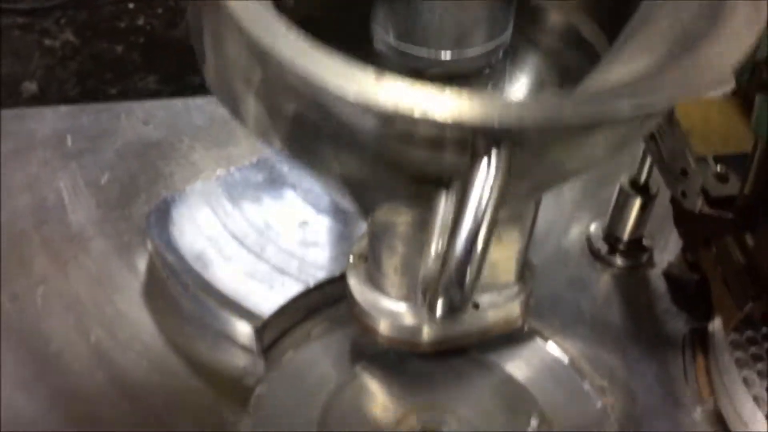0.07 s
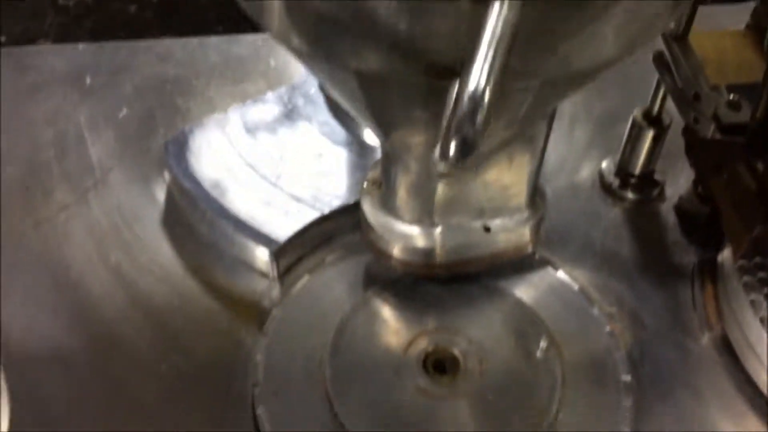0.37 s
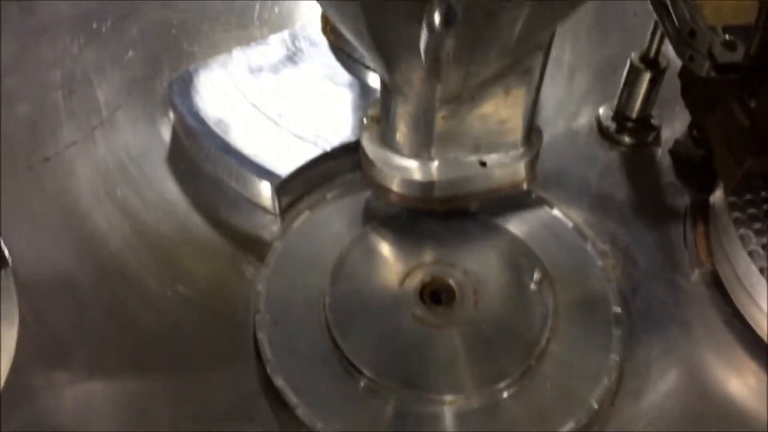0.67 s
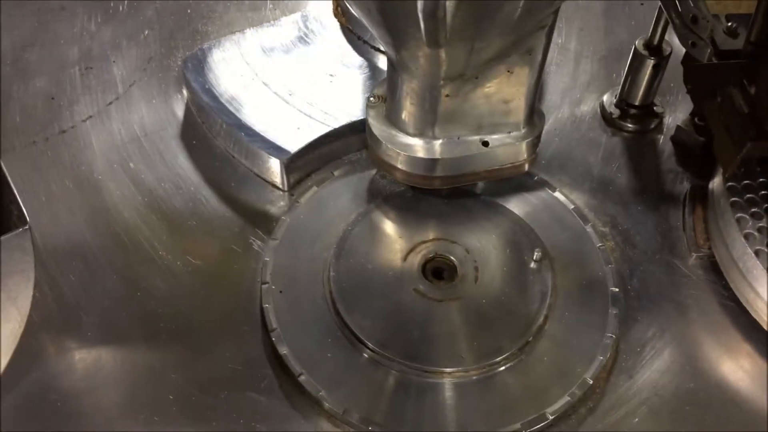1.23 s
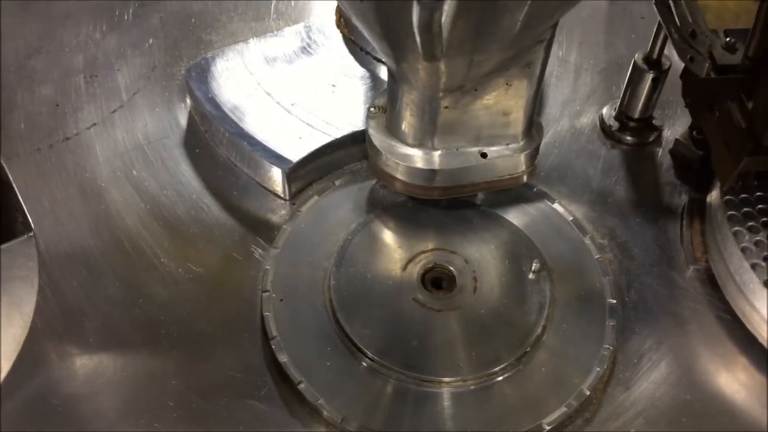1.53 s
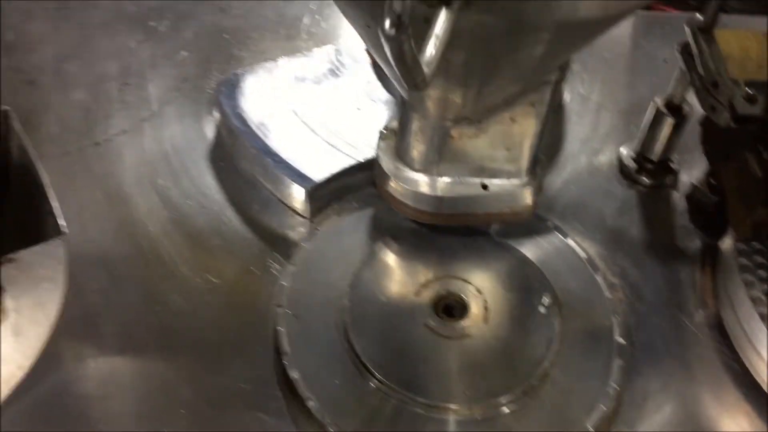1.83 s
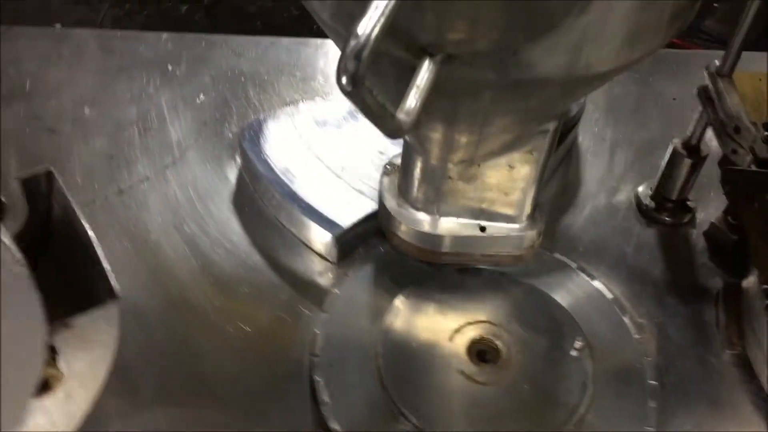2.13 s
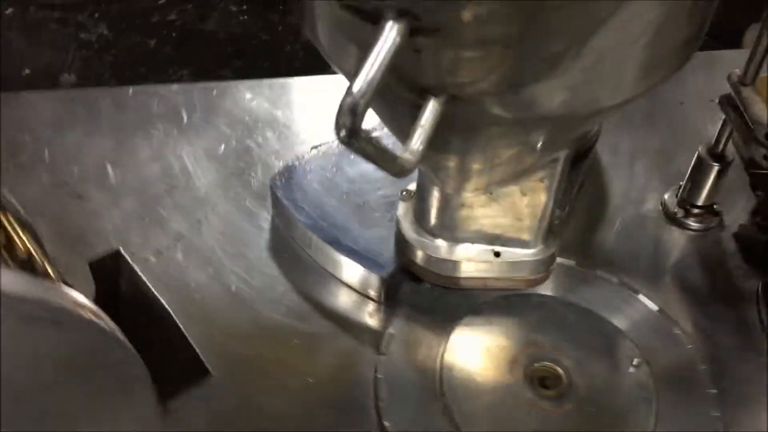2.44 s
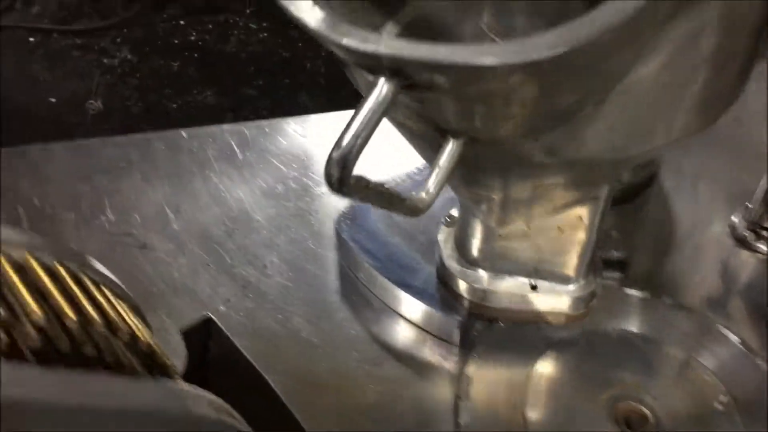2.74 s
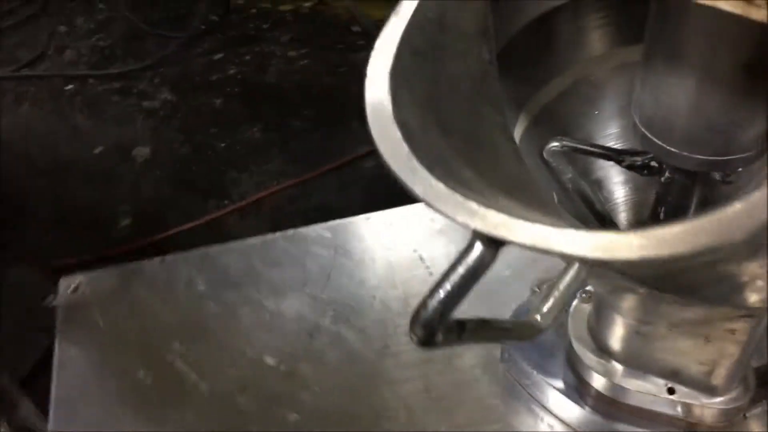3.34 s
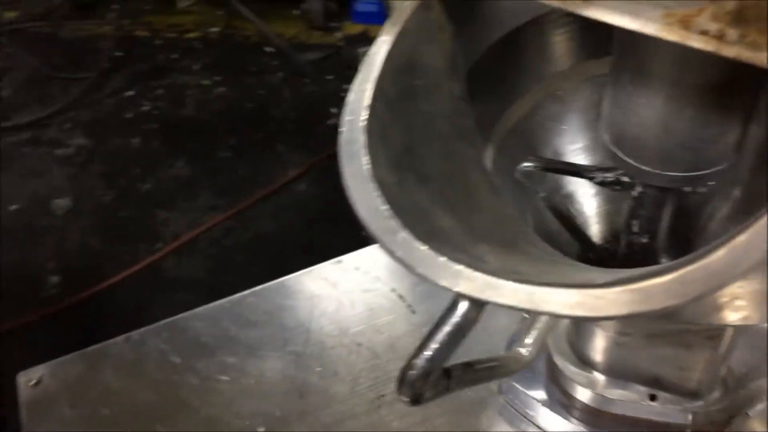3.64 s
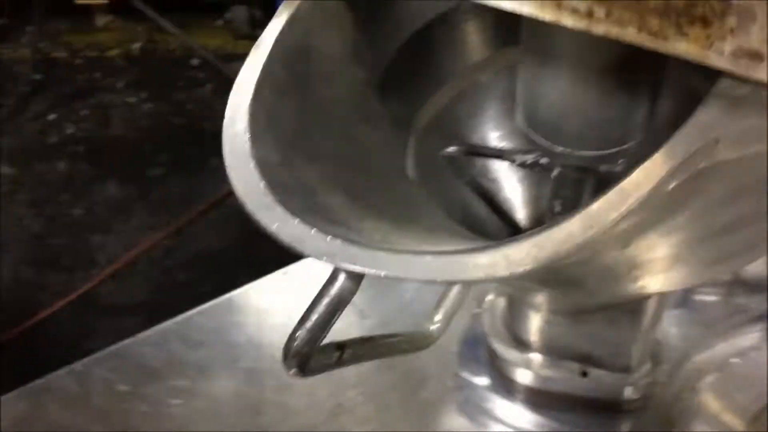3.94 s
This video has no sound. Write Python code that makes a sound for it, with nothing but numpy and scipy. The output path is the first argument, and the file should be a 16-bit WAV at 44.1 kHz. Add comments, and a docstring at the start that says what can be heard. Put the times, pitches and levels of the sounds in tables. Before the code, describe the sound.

Close up in a workshop, a motorised steel machine runs at full speed with a rattling, hissing drone. It then falls in pitch and stops with a sharp metallic click. Soft hum and a few small ticks remain.

```python
"""A capsule filling machine runs at full speed: its motor turns a seven-beat drive that drones,
rattles and hisses in a steel housing. At about 2 s the power is cut and the drive coasts down
through the housing's resonances, shaking the panels. A metal catch clicks as it comes to rest.
Mains hum, workshop air and a few faint ticks remain; a faint whir fades in near the end."""
import sys
import numpy as np
from scipy import signal
from scipy.fft import rfft, irfft
from scipy.io import wavfile
from scipy.ndimage import uniform_filter1d

SR = 44100
rng = np.random.default_rng(int(sys.argv[2]) if len(sys.argv) > 2 else 0)


def waveform_to_disk(signal):
    """Save audio, clipped to [-1, 1], as 16-bit WAV at the path in sys.argv[1]."""
    frames = np.transpose(np.atleast_2d(signal))
    scaled = np.clip(frames, -1, 1) * 32767
    samples = np.round(scaled).astype(np.int16)
    wavfile.write(sys.argv[1], SR, samples)


N = 176400
T = np.arange(N) / SR
HZ = np.fft.rfftfreq(N, 1 / SR)

SHAFT_HZ, BEATS_PER_TURN, TURNS_PER_BELT = 29.67, 7, 3
CUT_S, COAST_S, SLACK_RISE_S = 2.04, .6, .067
SLACK = np.clip((T - CUT_S) / SLACK_RISE_S, 0, 1)  # 0 under power, 1 coasting


def amp(db):
    """Decibels to gain."""
    return 10 ** (np.asarray(db) / 20)


def unit(x):
    """Scales to rms 1."""
    return x / np.sqrt(np.mean(x ** 2) + 1e-20)


def response(broad=((1, -80),), peaks=()):
    """Gain over HZ of a broad spectrum with resonances standing on it."""
    hz, db = np.transpose(broad)
    power = amp(np.interp(np.log(HZ + 1), np.log(hz + 1), db)) ** 2
    for centre, width, peak_db in peaks:
        power += (amp(peak_db) / (1 + 2 * ((HZ - centre) / width) ** 2)) ** 2
    return np.sqrt(power)


def colour(x, gain):
    """Minimum-phase filter with the given gain over HZ."""
    cepstrum = irfft(np.log(np.maximum(gain, 1e-6)), N)
    cepstrum[1:N // 2] *= 2
    cepstrum[N // 2 + 1:] = 0
    impulse = irfft(np.exp(rfft(cepstrum)), N)[:8192]
    return signal.fftconvolve(x, impulse)[:len(x)]


def noise_band(hz, width_hz, samples=N):
    """Band of noise, rms 1."""
    return unit(colour(rng.standard_normal(samples), 1 / (1 + (2 * (HZ - hz) / width_hz) ** 2)))


def drift(rate_hz):
    """Random motion below about rate_hz, rms 1."""
    return unit(irfft(rfft(rng.standard_normal(N)) / (1 + (HZ / rate_hz) ** 4), N))


def decay(t, t60_s):
    """Falls 60 dB in t60_s."""
    return np.exp(-np.log(1000) * t / t60_s)


def add(mix, start_s, sound):
    """Mixes a sound in at start_s."""
    part = mix[round(start_s * SR):][:len(sound)]
    part += sound[:len(part)]


def echoes(x, db, t60_s, delay_s):
    """Adds a diffuse tail of reflections."""
    t = np.arange(SR // 2) / SR
    tail = rng.standard_normal(len(t)) * decay(t, t60_s) * (t > delay_s)
    return x + amp(db) * signal.fftconvolve(x, tail / np.linalg.norm(tail))[:N]


# Workshop air. Each row: frequency in Hz, relative level in dB.
AIR_SPECTRUM = [(20, -27), (45, -2.5), (70, -4), (110, -4), (170, -11.5), (250, -5), (320, -14),
                (520, -14.5), (780, -19.5), (1000, -18.5), (1500, -28.5), (2200, -32.5), (3200, -39),
                (5000, -43), (8000, -46), (12400, -48.5), (16000, -51)]


def air():
    """Soft wash of air, slightly patchy in time and frequency."""
    spectra = signal.stft(rng.standard_normal(N), nperseg=1024)[2]
    patches = uniform_filter1d(rng.standard_normal(spectra.shape), size=8, axis=0)
    patch_db = 1.2 * unit(uniform_filter1d(patches, size=7, axis=1))
    wash = signal.istft(spectra * amp(patch_db), nperseg=1024)[1][:N]
    return amp(-49.5) * unit(colour(wash, response(AIR_SPECTRUM)))


# Mains hum envelope. Each row: time in seconds, rms level in dB.
MAINS_ENVELOPE = [(0, -45.5), (2.3, -42.5), (2.79, -42), (2.83, -53.5), (3.05, -50), (3.33, -52.5),
                  (3.36, -45), (4, -45)]
# Other equipment. Each row: frequency in Hz, rms level in dB.
EQUIPMENT_TONES = [(239.5, -52), (359.5, -65), (479, -65), (538, -62.5), (646, -68.5), (1443, -75),
                   (2590, -82), (4660, -87)]


def hum(mains_hz=120, waver=.23):
    """Mains hum that dips briefly after the stop, and wavering tones of other equipment."""
    out = amp(np.interp(T, *np.transpose(MAINS_ENVELOPE))) * np.sin(2 * np.pi * mains_hz * T)
    for hz, db in EQUIPMENT_TONES:
        out += amp(db) * (1 + waver * drift(7.5)) * np.sin(2 * np.pi * hz * T + waver * drift(3))
    return np.sqrt(2) * out


def whir(start_s=3.28, rise_s=.34):
    """A distant whir with a fuzzy tone in it fades in."""
    rush = amp(-67.5) * noise_band(hz=1700, width_hz=870)
    tone = amp(-66) * noise_band(hz=1448, width_hz=37)
    return (rush + tone) * np.clip((T - start_s) / rise_s, 0, 1)


# Knocks and ticks. Each row: start in seconds, level in dB, centre in Hz, width in Hz, T60 in seconds.
KNOCK_BURSTS = [(2.048, -41, 9000, 12000, 0.044), (2.524, -38, 820, 160, 0.11),
                (2.564, -34, 945, 264, 0.16), (2.622, -40, 956, 306, 0.14), (2.71, -66, 5000, 9000, 0.33),
                (2.786, -33, 81.5, 30, 0.13), (3.075, -43.5, 500, 400, 0.13),
                (3.345, -56.5, 3170, 1500, 0.083), (3.346, -52, 1470, 300, 0.06),
                (3.362, -60, 4000, 5000, 0.064), (3.594, -59, 4000, 4000, .018)]


def knocks():
    """Small dull knocks and ticks around the machine, from the power cut on."""
    out, t = np.zeros(N), np.arange(SR // 3) / SR
    for start_s, db, hz, width_hz, t60_s in KNOCK_BURSTS:
        add(out, start_s, amp(db) * noise_band(hz, width_hz, len(t)) * decay(t, t60_s))
    return out


# Strikes of the catch. Each row: start in seconds, level in dB.
CATCH_STRIKES = [(2.561, -25.5), (2.5635, -28.5), (2.574, -34.5), (2.6105, -40), (2.614, -44.5)]
# Crack of a strike. Each row: frequency in Hz, relative level in dB.
CRACK_SPECTRUM = [(100, -18), (900, -15), (2000, -13), (3000, -11), (7000, -16), (11000, -19), (16000, -11)]
# Resonances of the catch. Each row: centre in Hz, width in Hz, relative level in dB.
CATCH_RESONANCES = [(3870, 140, -3.5), (4750, 200, -8), (5500, 340, 0.5), (6690, 250, 9.5), (6900, 220, 5),
                    (9000, 300, 5.5), (9400, 320, 4), (11000, 320, 6), (11900, 400, -8), (13600, 600, -4)]


def catch():
    """A steel catch snaps home and rebounds; each crack rings briefly in its resonances."""
    out, t = np.zeros(N), np.arange(SR // 3) / SR
    envelope = decay(t, t60_s=.026) + amp(-16) * decay(t, t60_s=.09)
    for start_s, db in CATCH_STRIKES:
        add(out, start_s, amp(db) * envelope * rng.standard_normal(len(t)))
    return colour(out, unit(response(CRACK_SPECTRUM, CATCH_RESONANCES)))


# Shaken panels. Each row: centre in Hz, width in Hz, relative level in dB.
PANEL_RESONANCES = [(385.6, 24, 7.5), (733, 52, -4.5), (830, 58, 0), (929, 44, 2), (1040, 54, -14),
                    (1450, 150, -14), (4060, 350, -36)]


def panel_shake(speed):
    """With the power off, the slack drive shakes the panels unevenly until it stops."""
    shake = unit(colour(rng.standard_normal(N), response(peaks=PANEL_RESONANCES)))
    lumps_db = 2.5 * drift(20)
    return amp(-33 + lumps_db) * shake * SLACK * speed ** .78


# Sliding friction. Each row: frequency in Hz, relative level in dB.
SLIDE_SPECTRUM = [(100, -68), (1500, -10), (2420, -9), (2800, -2.5), (3700, -2.5), (4900, -12.5),
                  (6300, -8), (8000, -16.5), (10200, -22.5), (12500, -24.5), (15500, -34.5)]
# High resonances of the steel. Each row: centre in Hz, width in Hz, relative level in dB.
STEEL_RESONANCES = [(4084, 116, 10), (4325, 79, 7), (4720, 180, -1), (5370, 220, -2.5), (7160, 280, -4),
                    (8960, 570, -5.5), (11230, 650, -16.5)]


def hiss(speed, turns, settle_s=.47, scrape_s=2.055, scrape_width_s=.016):
    """Sliding parts hiss in pulses and ring the steel; they scrape as the load comes off."""
    surface = rng.standard_normal(1480)  # grain that comes round on every turn
    grain = np.interp(turns, np.linspace(0, 1, len(surface), endpoint=False), surface, period=1)
    pulse = 1 + .087 * np.cos(2 * np.pi * BEATS_PER_TURN * turns)
    flicker_db = 1.2 * drift(49)
    belt_slap_db = -.76 * np.cos(2 * np.pi * 2 * turns / TURNS_PER_BELT)
    scrape_db = 2 * np.exp(-((T - scrape_s) / scrape_width_s) ** 2)
    swing_db = flicker_db + belt_slap_db + scrape_db
    early_boost = amp(7 * np.exp(-(T / settle_s) ** 2))
    rub = (rng.standard_normal(N) + .39 * grain) * pulse * amp(swing_db) * early_boost
    slide = unit(colour(rub * speed ** 3.4, response(SLIDE_SPECTRUM)))
    chatter = rng.standard_normal(N) * amp(swing_db + 3 * drift(135)) * np.sqrt(early_boost)
    steel = unit(colour(chatter * speed ** 4.7, response(peaks=STEEL_RESONANCES)))
    return amp(-44) * slide + amp(-45.5) * steel


# Broad response of the housing. Each row: frequency in Hz, relative gain in dB.
HOUSING_SPECTRUM = [(20, -21), (60, -16), (150, -16.5), (300, -16.5), (1000, -35.5), (1750, -22.5),
                    (2380, -33), (3100, -32.5), (5000, -56), (16000, -56)]
# Its resonances. Each row: centre in Hz, width in Hz, relative gain in dB.
HOUSING_RESONANCES = [(201, 23.2, -3), (324.3, 23, -5), (376, 31, 2.5), (454, 55, -9.5), (592, 114, -12),
                      (744, 50, -8), (813, 103, -2.5), (913, 77, -6), (1021, 90, -6), (1220, 51, -12),
                      (1462, 107, -9.5), (1924, 37, -11), (2037, 64, -10), (2585, 172, -19.5)]


def housing():
    """Gain over HZ of the steel housing, which shapes rattle and drone."""
    return response(HOUSING_SPECTRUM, HOUSING_RESONANCES)


def rattle(speed, turns, body, spread_db=4.5):
    """Uneven knocks on each beat and loose chatter, loaded by belt and shaft, ring the housing."""
    beats = np.diff(np.floor(turns * BEATS_PER_TURN), prepend=0)
    hits = beats * rng.choice([-1, 1], N) * amp(spread_db * np.clip(rng.standard_normal(N), -2, 2))
    chatter = rng.standard_normal(N) * np.sqrt(speed)
    load = 1 + .079 * np.sin(2 * np.pi * turns / TURNS_PER_BELT) + .25 * np.sin(2 * np.pi * turns)
    force = (unit(hits) * speed ** .79 + unit(chatter)) * load * speed ** 1.35
    return amp(-34.5) * unit(colour(force, body))


# Drive tones. Each entry: frequency as a multiple of the shaft rate.
SHAFT_ORDERS = [6.667, 7, 7.195, 11, 12.84, 14, 15, 21, 24, 25, 27, 28, 30, 31.69, 35, 40.5, 49, 52.04, 56,
                63, 69.8, 77, 84, 88, 105, 135.75, 147.37]
# Their levels, in the same order. Each entry: amplitude at full speed in dB.
SHAFT_ORDER_DB = [-93, -26, -47, -47.5, -40.5, -35, -50, -41, -52, -50.5, -47, -29, -56, -42, -44, -52,
                  -43.5, -50.5, -52, -51.5, -46.5, -59, -54.5, -65, -48.5, -54, -47.5]


def drone(speed, turns, body, max_swell_db=19, radiate_hz=186, throb_hz=5.8):
    """Shaft orders throb and waver; coasting, they roughen and swell across the housing's resonances."""
    out = np.zeros(N)
    for order, db in zip(SHAFT_ORDERS, SHAFT_ORDER_DB):
        full_hz = order * SHAFT_HZ
        hz = full_hz * speed
        swell = np.minimum(np.interp(hz, HZ, body) / np.interp(full_hz, HZ, body), amp(max_swell_db))
        radiation = np.minimum(hz / radiate_hz, 1) ** 6  # the housing barely radiates low tones
        belt_wobble = .29 * np.sin(2 * np.pi * (turns / TURNS_PER_BELT + rng.random()))
        waver = (.16 + .45 * SLACK) * drift(28)
        height = full_hz / 900  # high tones die sooner and jitter more
        force = speed ** (.9 * height ** 2) * (1 + belt_wobble + waver)
        jitter_rad = 1.1 * SLACK * height * drift(23)
        tone = np.sin(2 * np.pi * (order * turns + rng.random()) + jitter_rad)
        out += amp(db) * swell * radiation * force * tone
    throb = 1 + .089 * np.cos(2 * np.pi * throb_hz * T)
    return out * np.sqrt(speed) * throb


def motor():
    """Speed as a share of full speed, and shaft turns; friction stops the motor after the cut."""
    speed = np.clip(1 - (T - CUT_S) / COAST_S, 0, 1) ** 1.42
    belt_flutter = .0015 * np.sin(2 * np.pi * np.cumsum(speed) * SHAFT_HZ / TURNS_PER_BELT / SR)
    wander = .0003 * drift(2)
    turns = np.cumsum(speed * (1 + belt_flutter + wander)) * SHAFT_HZ / SR
    return speed, turns


def scene():
    """Machine and workshop in mono; hiss, catch and knocks reflect off the walls."""
    speed, turns = motor()
    body = housing()
    drive = drone(speed, turns, body) + rattle(speed, turns, body) + panel_shake(speed)
    hiss_in_frame = echoes(hiss(speed, turns), db=-5, t60_s=.045, delay_s=.002)
    in_room = echoes(hiss_in_frame + catch() + knocks(), db=-14, t60_s=.18, delay_s=.0069)
    return (drive + in_room + hum() + air() + whir())[None]


def record(dry):
    """Steep low-pass at 15.9 kHz."""
    lowpass = signal.firwin(511, 15900, window=("kaiser", 9), fs=SR)
    return signal.oaconvolve(dry, lowpass[None], "same")


dry = scene()
out = record(dry)
waveform_to_disk(out)
```